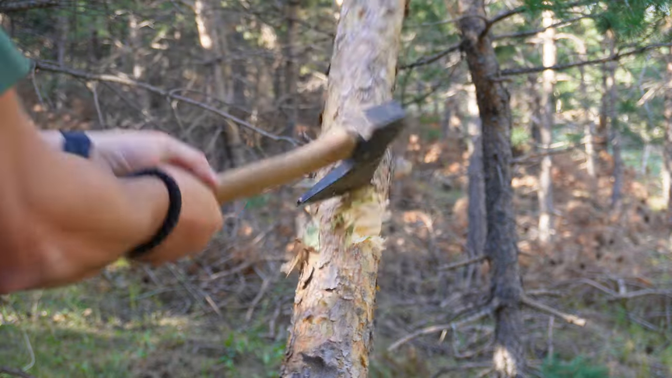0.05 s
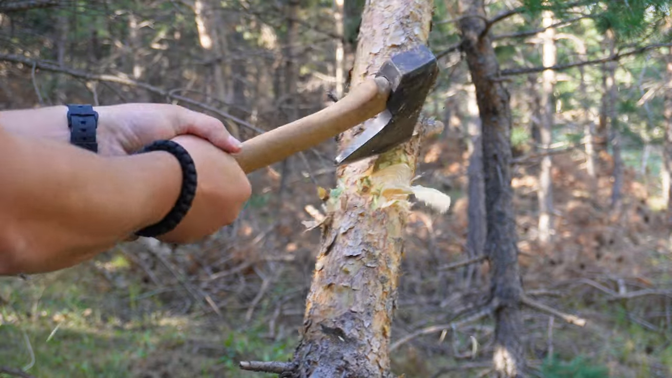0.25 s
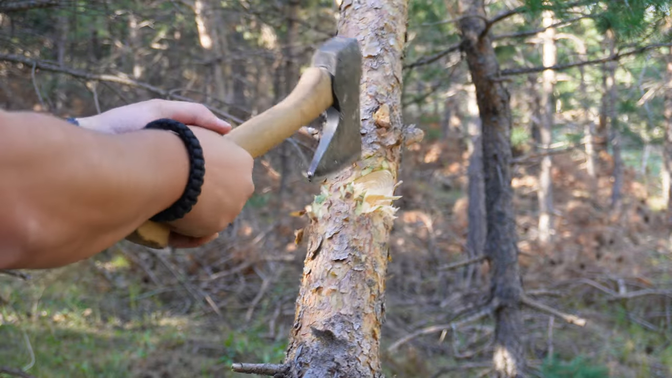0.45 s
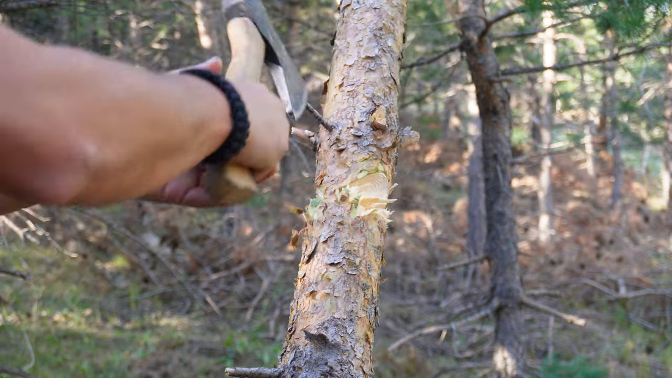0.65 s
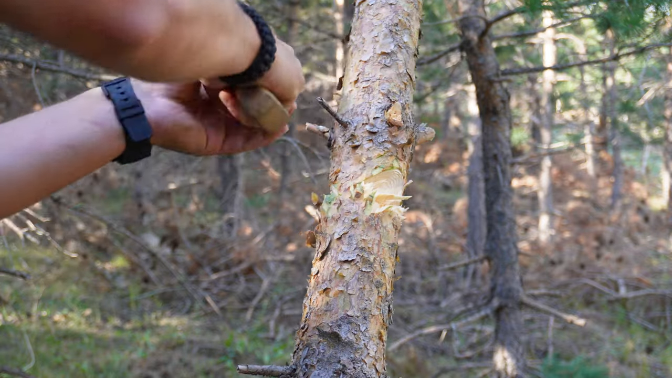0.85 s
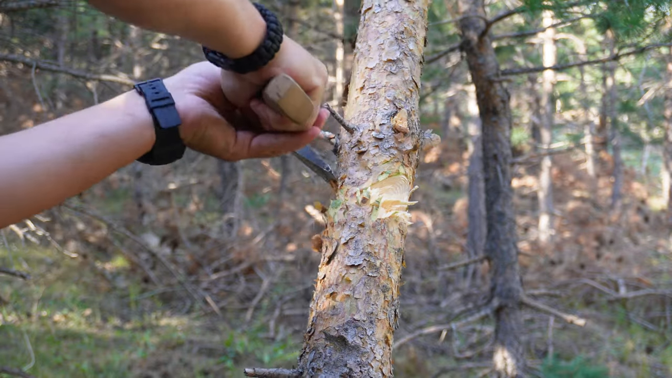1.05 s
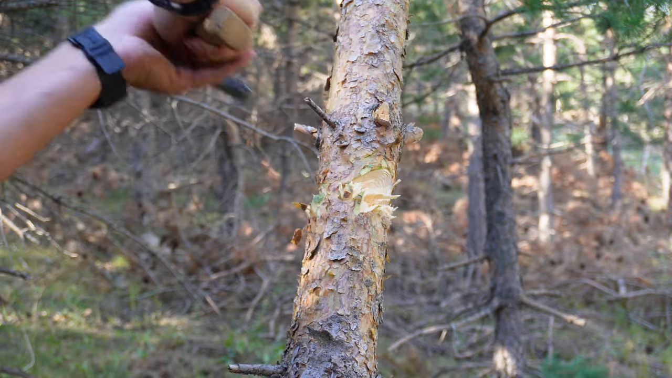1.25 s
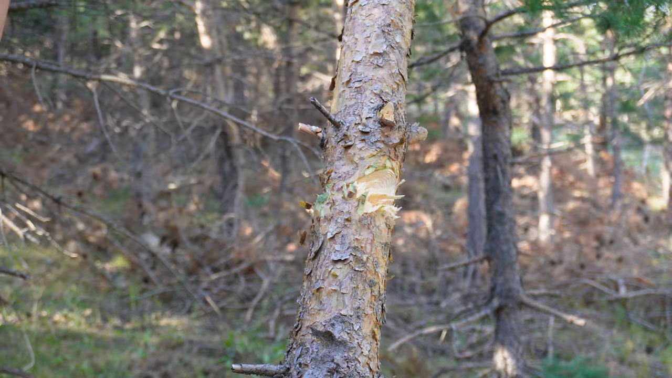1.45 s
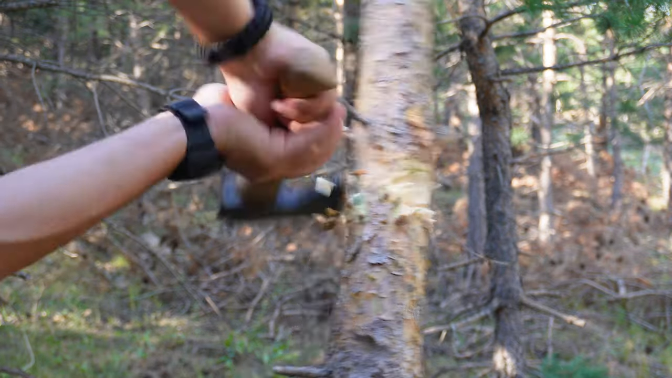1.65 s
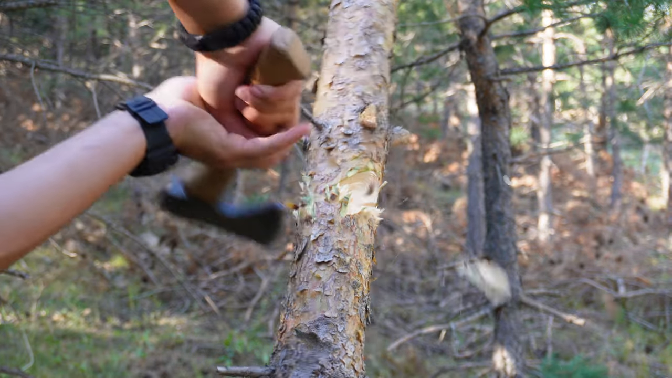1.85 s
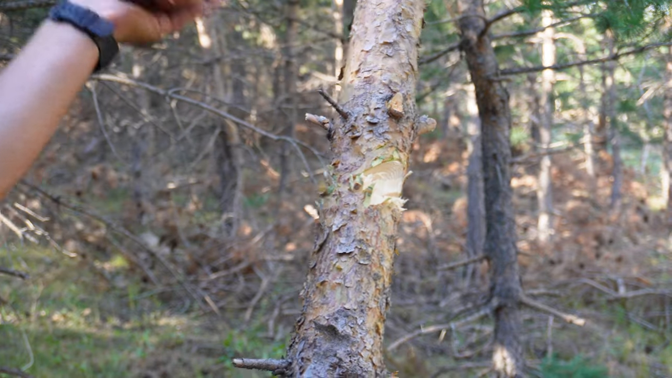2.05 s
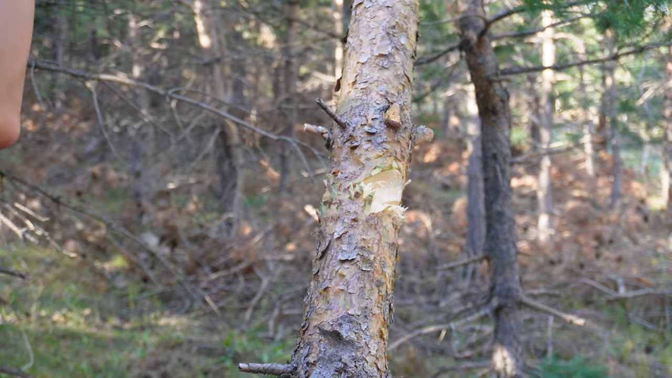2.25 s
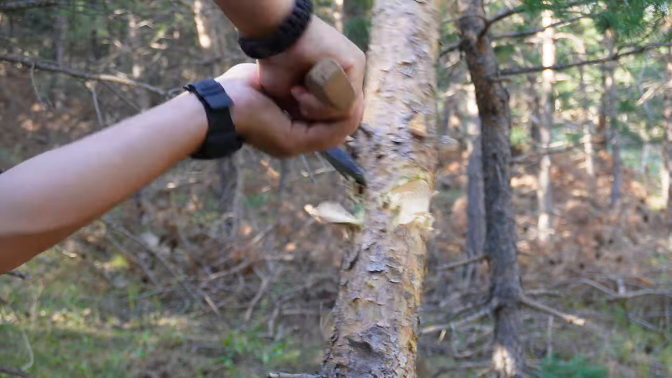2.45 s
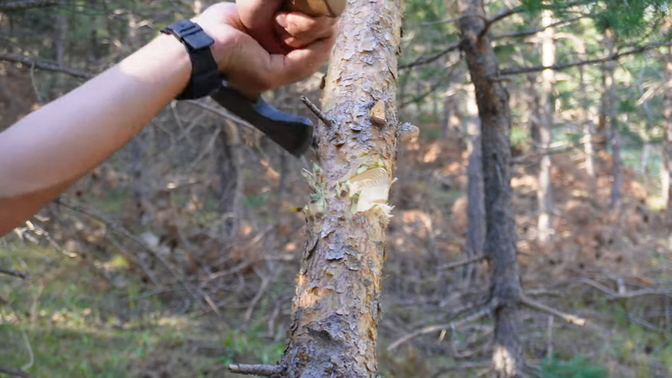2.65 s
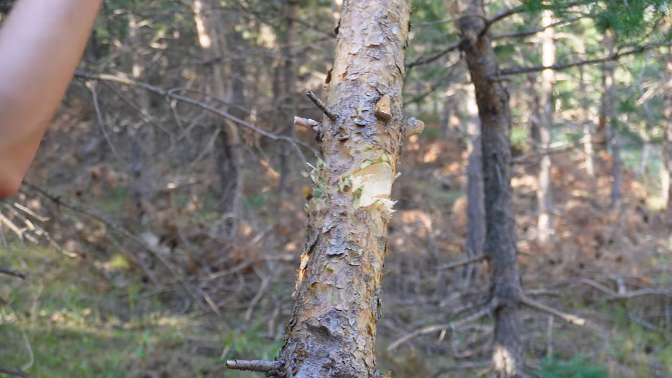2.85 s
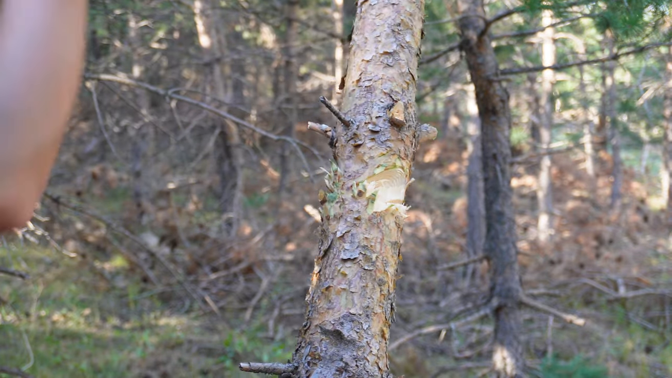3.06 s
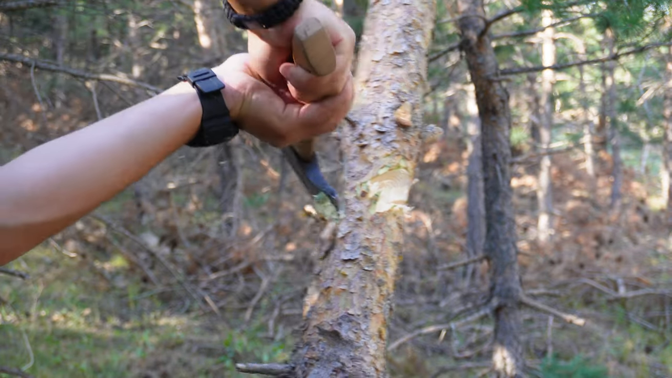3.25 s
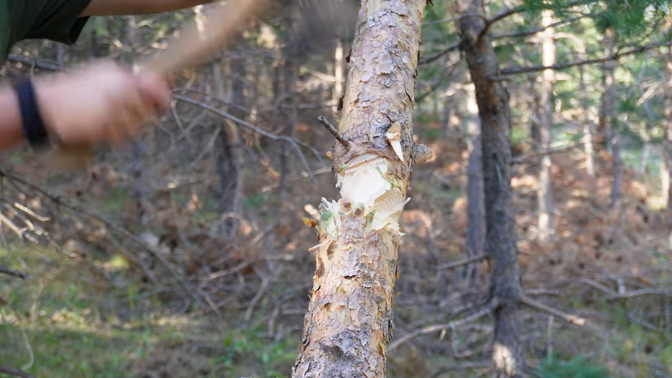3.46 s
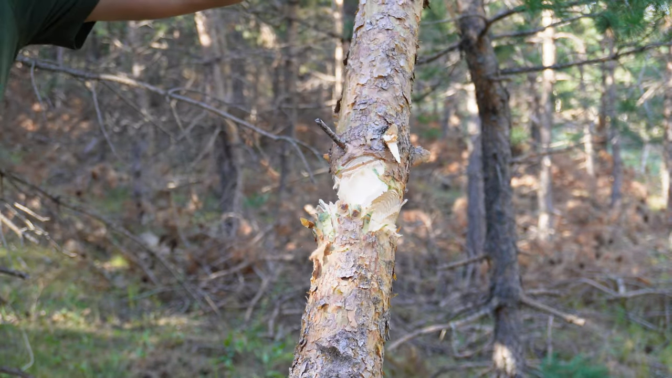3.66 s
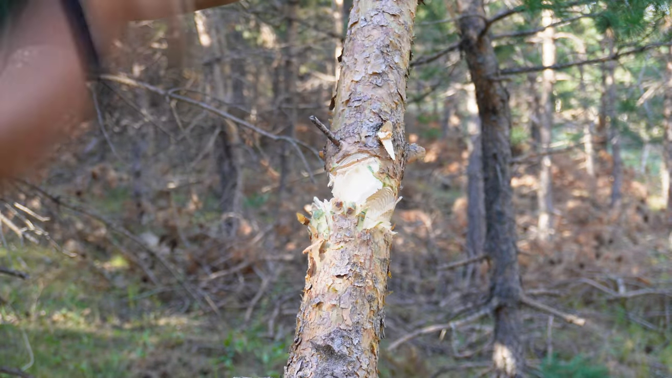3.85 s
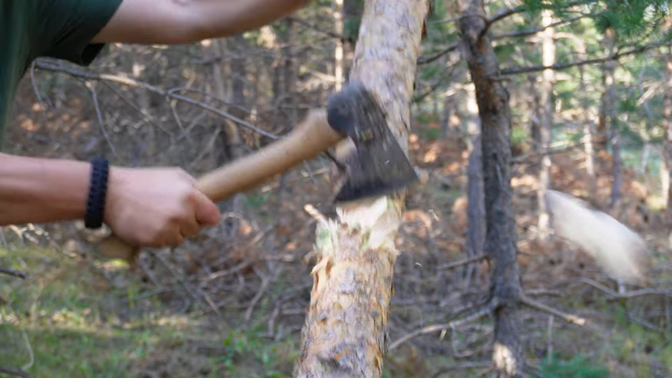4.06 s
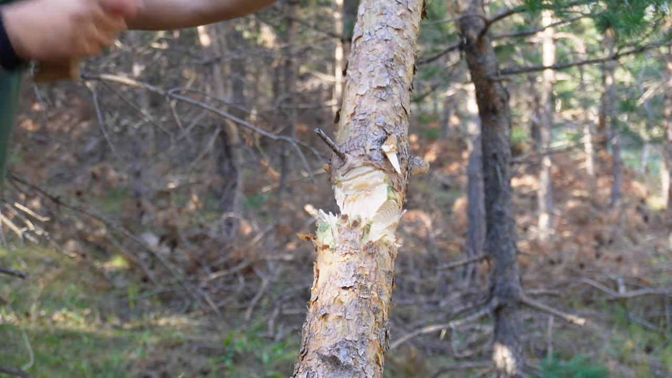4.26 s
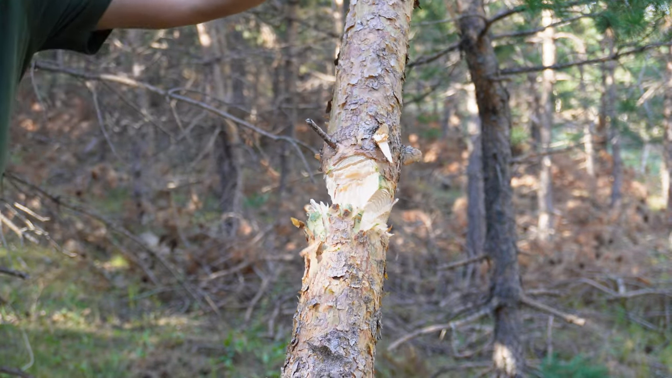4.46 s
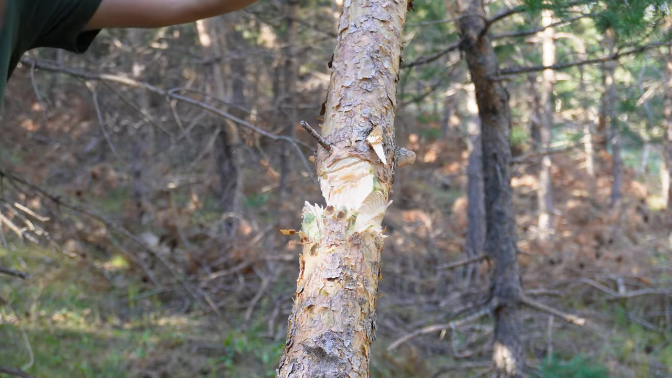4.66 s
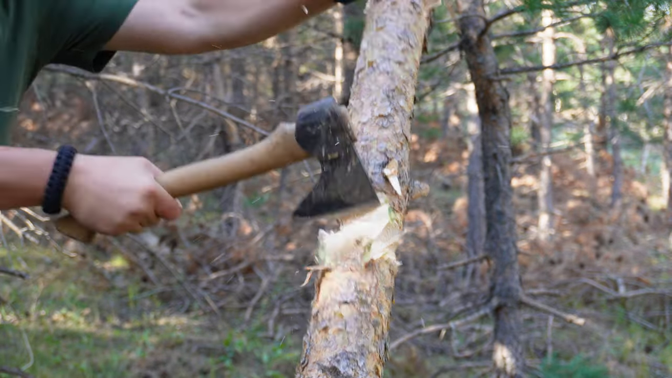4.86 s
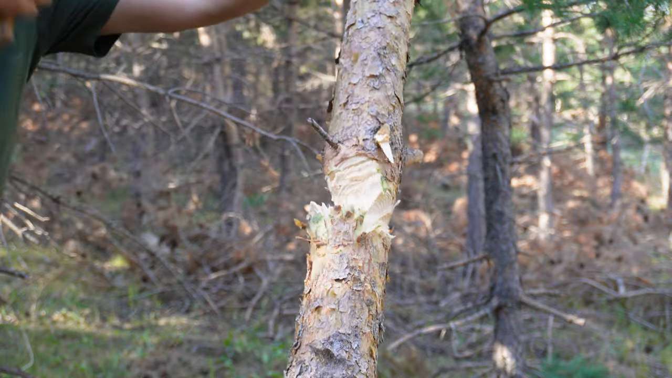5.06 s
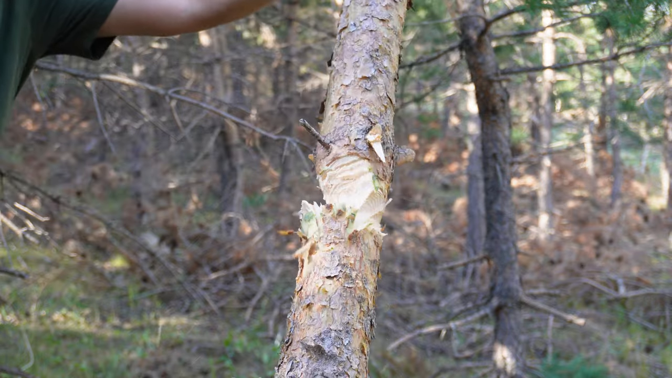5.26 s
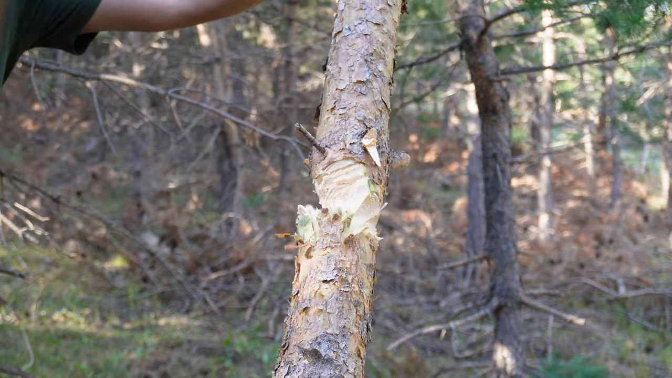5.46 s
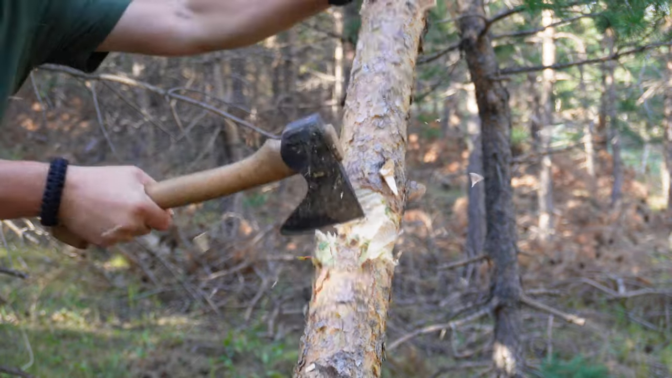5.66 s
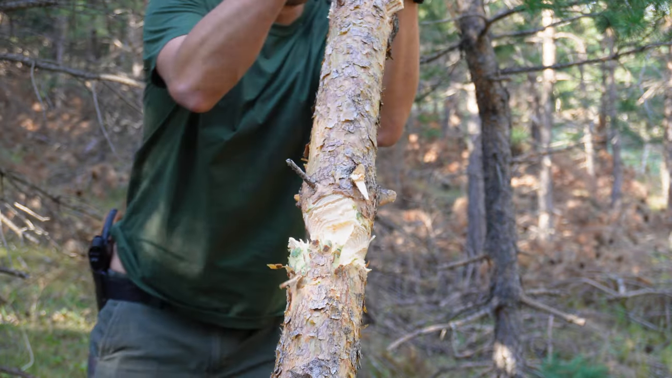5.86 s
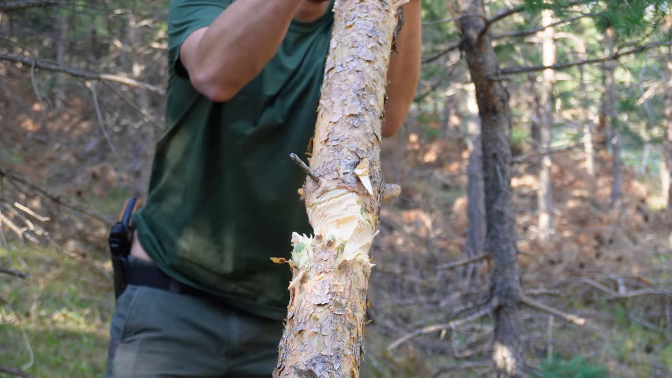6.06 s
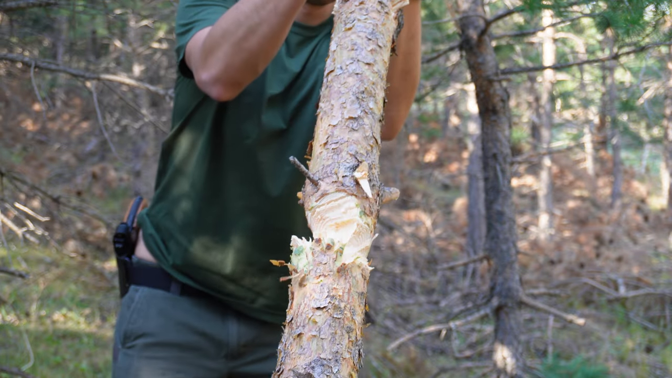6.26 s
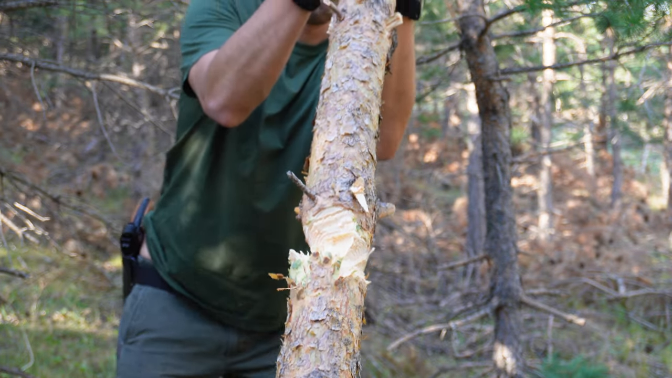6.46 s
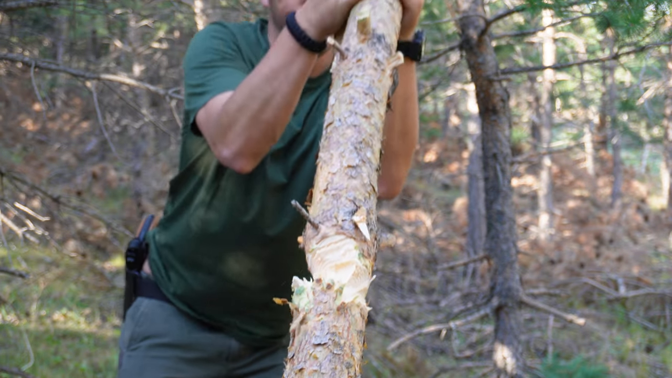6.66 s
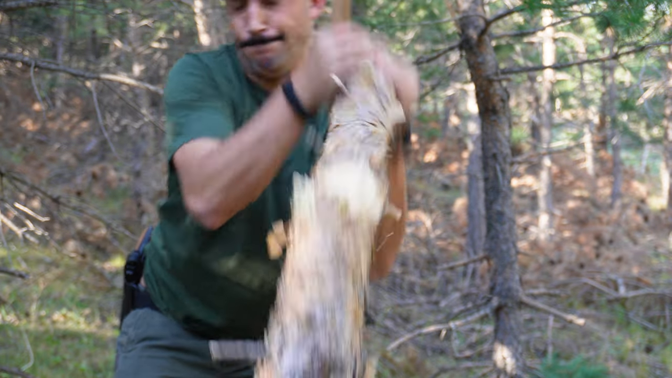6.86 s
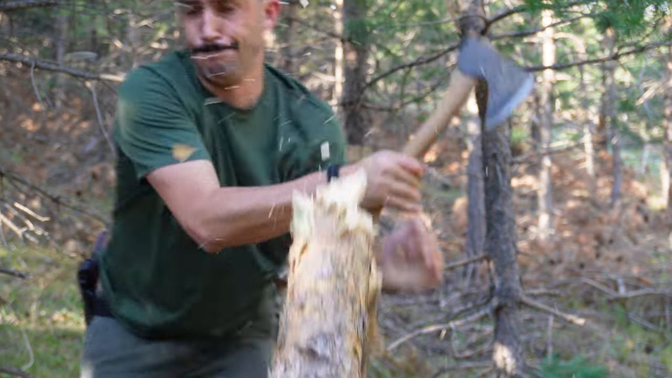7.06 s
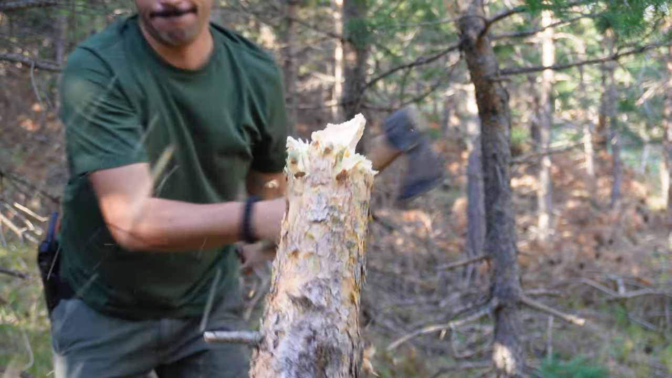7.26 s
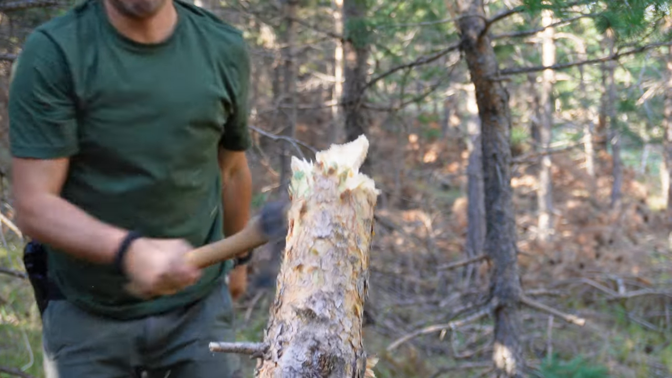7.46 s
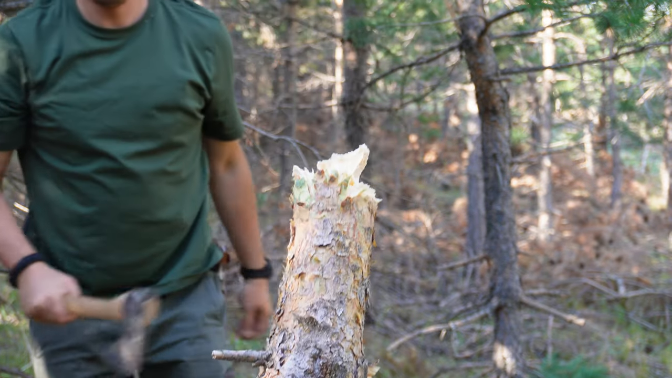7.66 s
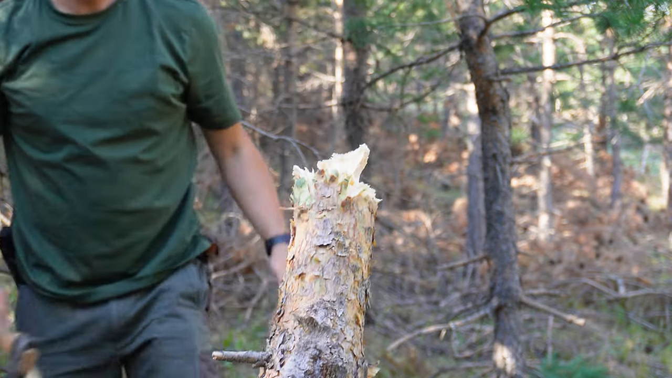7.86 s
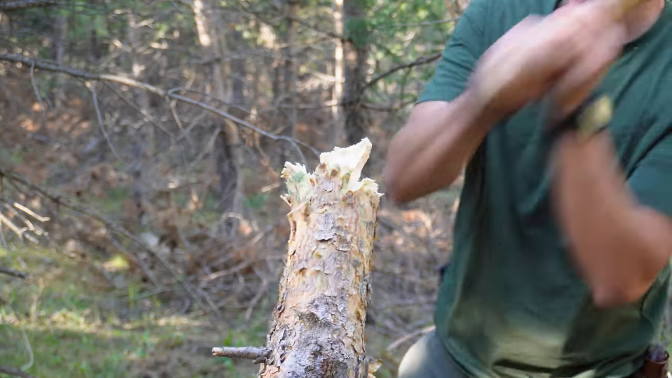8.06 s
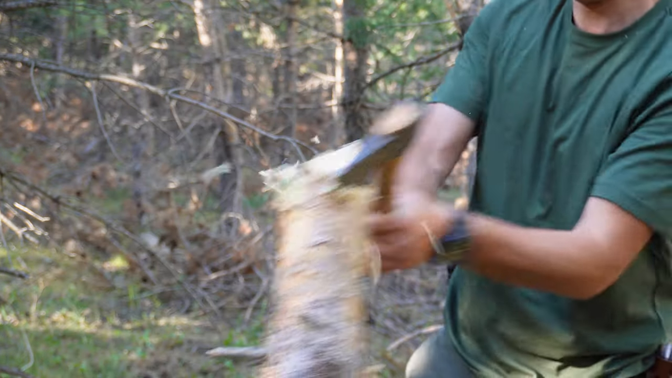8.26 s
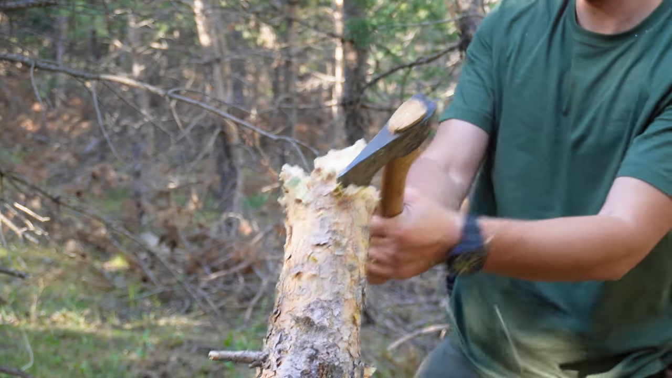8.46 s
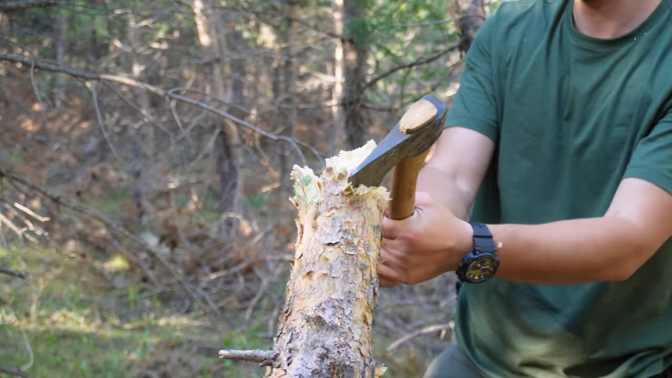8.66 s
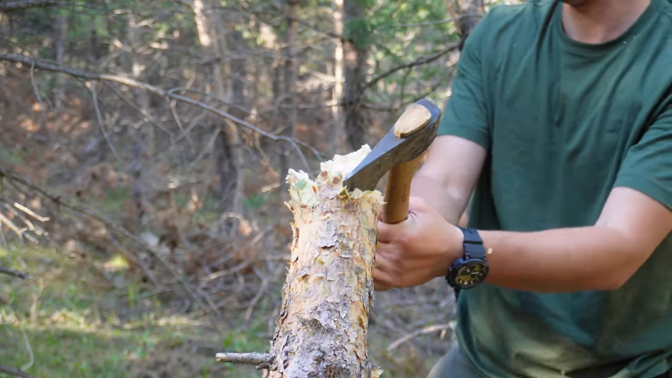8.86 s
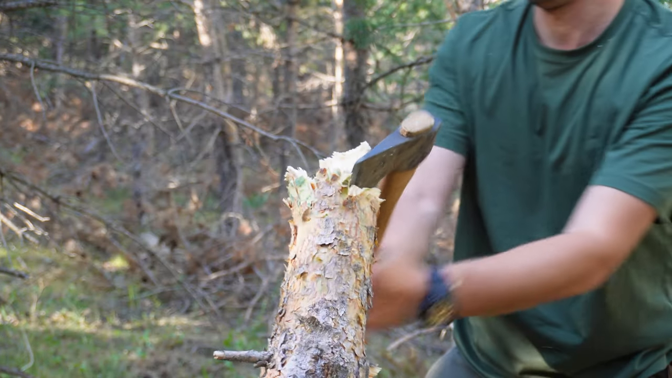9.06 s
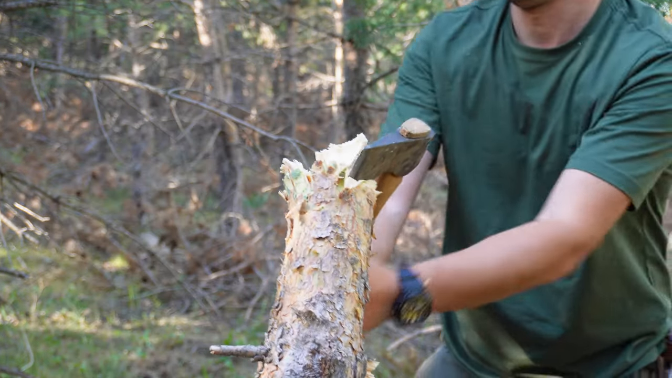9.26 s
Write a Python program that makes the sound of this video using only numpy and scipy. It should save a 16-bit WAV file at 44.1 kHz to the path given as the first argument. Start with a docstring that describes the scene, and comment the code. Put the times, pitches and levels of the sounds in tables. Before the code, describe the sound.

In a quiet woodland, heard close with slight stereo width, an axe bites a standing trunk about once a second or faster, one or two strokes much weaker. Fibres crunch and splinters tick down. Then the top tears away with rapid violent cracks, hollow knocks and falling rustle, thinning out before one last solid blow and soft settling.

```python
"""In a quiet forest a hatchet chops a thin standing pine; the top tears off and drops, then one more blow falls.
Each blow is a noise-burst crack, a bending wave falling in pitch and a slow modal ring of the trunk.
Fibres snap and crunch as short filtered bursts, loose wood knocks in damped modes, and debris rustles down
as dense clicks and hiss. The trees around scatter blows and snaps back as decaying noise bands, over a
hush of shaped noise."""
import sys
import numpy as np
from scipy import signal
from scipy.fft import rfft, irfft
from scipy.io import wavfile
from scipy.ndimage import uniform_filter1d

SR = 44100
rng = np.random.default_rng(int(sys.argv[2]) if len(sys.argv) > 2 else 0)


def generate_wav(sig):
    """Save sig (samples, or channels by samples) to the path in sys.argv[1] as 16-bit PCM at SR."""
    pcm = np.round(np.clip(np.atleast_2d(sig).T, -1, 1) * 32767).astype(np.int16)
    wavfile.write(sys.argv[1], SR, pcm)


N = 410570

# axe blows; all levels are relative settings: (t/s, crack level/dB, crack centre f/Hz, trunk ring level/dB,
# bending wave level/dB, echo level re crack/dB, sway level re trunk ring/dB)
AXE_BLOWS = [(0.089, -5, 1900, -25.5, -24.5, -2, -24), (1.031, -20.5, 3800, -47, -37.5, -16.5, -16),
             (1.731, -5.5, 2270, -23.5, -24.5, -1.5, -13.5), (2.511, -9, 3040, -30.5, -18.5, 0.5, -17),
             (3.22, -6.5, 3400, -33, -22, -0.5, -19), (3.991, -0.5, 3660, -25.5, -18, -3, -18),
             (4.544, -19, 2430, -64, -27.5, -27, -5), (4.826, -4, 2860, -26.5, -22.5, -1.5, -17),
             (5.626, -3.5, 2210, -26, -17, -3.5, -12.5), (8.238, -5.5, 2100, -32.5, -18, -3.5, -11)]
# bending modes of the trunk: (f/Hz, level/dB, t60/s)
TRUNK_MODES = [(113.6, 11, 0.1), (96.6, -10.5, 0.24), (134.5, -8.5, 0.2), (190, 4.5, 0.077)]
# slowest modes, shaking the ground: (f/Hz, level/dB, t60/s)
SWAY_MODES = [(48.5, -11.5, 0.67), (68, 1.5, 0.21)]
# modes of the wood beside the cut: (f/Hz, level/dB, t60/s)
NOTCH_MODES = [(262, 1.5, 0.042), (372, -11, 0.091), (473, 0.5, 0.041), (647, -6, 0.067), (753, -23, 0.14),
               (1189, -2.5, 0.046), (1876, -6, 0.022)]


def blows():
    """Impact excitation: a broadband crack sets off dispersive bending waves, trunk modes and scatter."""
    out, t = np.zeros((2, N)), np.arange(SR // 2) / SR
    for s, db, hz, ring_db, wave_db, echo_db, sway_db in AXE_BLOWS:
        # the crack has a flat top of about 3 ms
        crack = np.tanh(2 * burst(t[:2000], hz, 0.0028, 0.0033, -51.0))
        add(out, s, undb(db) * band(crack, 1400, 14.0))
        bending_wave(out, s, wave_db, t)
        add(out, s, undb(wave_db + 7.0) * ring(NOTCH_MODES, t, 3.5, 0.0085))
        trunk = ring(TRUNK_MODES, t, 1.5, .013)
        sway = ring(SWAY_MODES, t, 4.2, 0.003)
        late_s = s + .011  # the trunk's low ring starts about 11 ms after the crack
        add(out, late_s, undb(ring_db + 12.0) * (trunk + undb(sway_db) * sway))
        echo = trees()
        ragged = flicker(echo.shape[1], 90, 1.8)
        add(out, s, undb(db + echo_db - 26.5) * echo * ragged)
    return pan(out, LEFT_DB)


def bending_wave(out, s, wave_db, t):
    """Dispersion: treble arrives before bass, so the wave falls in pitch; the ends of the trunk return it
    twice."""
    chance = rng.standard_normal((3, 2))
    for delay_s, loss_db, (a, b) in zip((0, .002, .005), (0, -2.0, -5.0), chance):
        sweep_hz = 2600 * (1 + t / 0.00345) ** -1.4 * (1 + 0.308 * a)
        phase = 2 * np.pi * np.cumsum(sweep_hz) / SR
        wave = np.sin(phase) * fade(t, .022) * (1 - np.exp(-t / .001))
        wave = wave * flicker(len(t), 400, 5.7)
        add(out, s + delay_s * (1 + 0.17 * b), undb(wave_db + loss_db + 6.0) * wave)


# the loudest fibres and chips snapping: (t/s, peak level/dB, centre f/Hz, treble edge level re body/dB)
FIBRE_SNAPS = [(0.1014, -11, 2590, -30), (0.138, -13.5, 2830, -7), (0.546, -27, 3550, -7),
               (0.564, -27.5, 2720, -7), (1.6588, -26.5, 3460, -26), (.156, -28, 3000, -17),
               (1.795, -7, 3040, -4.5), (1.944, -18.5, 3160, -27), (1.971, -22, 3060, -1),
               (1.983, -27, 3100, -21), (2.046, -24.5, 3230, -16), (2.4759, -28, 1350, -24),
               (2.4842, -6, 1780, -29), (2.5119, -1, 5500, -7), (3.3348, -25.5, 850, -24),
               (3.4736, -23, 3140, -21), (3.483, -23, 3880, -23), (3.523, -20.5, 3080, -8),
               (3.5713, -27.5, 4300, -16), (3.5924, -23, 3500, -16), (3.8474, -18.5, 2180, -23),
               (3.9454, -20, 2140, -33), (4.355, -31.5, 2740, -18), (4.431, -28, 3970, -18),
               (4.5575, -7, 4600, -23.5), (4.6805, -18, 1890, -26), (5.122, -33, 3470, -14),
               (5.1939, -24, 3240, -13), (5.2688, -27, 2880, -32), (5.559, -28.5, 3000, -9),
               (5.6617, -13, 2560, -13), (5.745, -34, 6500, -11), (6.7791, -17.5, 3840, -28),
               (6.812, -1.5, 1740, -14.5), (6.8608, -18, 3000, -19), (6.8708, -8, 3920, -21),
               (6.8948, -5, 1170, -25), (6.9016, 2, 2800, -27), (6.9182, -3, 4500, -28),
               (6.9201, 3.5, 2950, -13), (6.9318, -4, 2860, -21), (6.942, -7, 2760, -19),
               (6.9558, -3, 2820, -27), (6.9602, -3, 4030, -20), (6.964, -2, 6300, -22),
               (6.9662, -13, 7240, -1), (6.9726, -5, 7200, -25), (6.9743, -6, 1370, -26),
               (6.9865, -6, 4160, -12), (6.992, -2, 3600, -14), (7.0108, 0, 4400, -12),
               (7.0171, 0, 4000, -10), (7.0205, -10, 3170, -12), (7.0385, -10, 4300, -10),
               (7.051, -8, 4630, -10), (7.1218, -2.5, 3330, -26), (7.203, 2, 4300, -18),
               (7.205, -11, 4580, -10), (7.2169, -3.5, 4440, -17), (7.307, -15, 2860, -23),
               (7.32, -14, 2960, -26), (7.4422, 0, 1366, -22), (7.5802, -13, 4480, -2),
               (7.617, -26.5, 960, -18.5), (7.6564, -16.5, 4530, 1), (7.699, -23.5, 1810, -23),
               (7.8185, -21, 4100, -19), (7.8406, -21, 2750, -32), (7.8565, -8, 5350, -33),
               (7.8801, -12.5, 4600, -27), (7.9038, -7.5, 4100, -32), (7.9897, -23, 2980, 2.5),
               (8.193, -14, 1820, -22), (8.282, -13, 2960, -13), (8.3222, -23.5, 2970, -28),
               (8.3617, -33, 2900, -17), (8.508, -29, 3170, -2.5), (8.6937, -30.5, 1596, 10),
               (8.743, -29, 6050, -9), (8.7957, -24.5, 4290, -2), (8.837, -33, 3520, -10),
               (8.9, -28.5, 4020, 1), (9.21, -29, 7100, 1)]
SNAP_CYCLES = 12  # t60 of a snap's main decay, in cycles of its centre


def snaps():
    """Sudden stress release: fibres give way and chips clack, each with a faint scattered answer."""
    out, call, t = np.zeros((2, N)), np.zeros((1, N)), np.arange(3000) / SR
    for s, db, hz, bright_db in FIBRE_SNAPS:
        t60 = SNAP_CYCLES / hz
        snap = burst(t, hz, 0.000072, t60, bright_db)
        add(out, s, undb(db) * pan(snap, LEFT_DB + 1.4 * rng.standard_normal()))
        call[0, int(s * SR)] = undb(db) * np.sqrt(t60 / 0.026)  # longer snaps carry more energy out
    answer = signal.fftconvolve(call, trees(), axes=1)[:, :N]
    return out + undb(-37.5) * answer


# clusters of wood crunching: (t/s, peak level/dB, centre f/Hz, length/s)
WOOD_CRUNCHES = [(1.757, -13.5, 2050, 0.022), (1.902, -12.5, 4500, 0.022), (2.516, -11, 2100, 0.046),
                 (3.033, -37, 3000, 0.011), (3.224, -9.5, 2590, 0.028), (4.555, -15.5, 2250, 0.015),
                 (6.83, -4.5, 2960, 0.0093), (6.843, -17, 2180, 0.0093), (6.892, 7, 2620, 0.0024),
                 (6.967, -5, 2900, 0.0068), (7.473, -16, 2430, .012), (7.503, -10, 4630, 0.0076),
                 (7.543, -21, 2600, 0.0084), (7.565, -32, 2920, 0.0088), (7.596, -28, 1980, 0.0098),
                 (7.633, -21.5, 2180, 0.01), (7.679, -18.5, 3330, 0.018), (7.709, -24, 5500, 0.013),
                 (7.742, -24, 2700, 0.026), (7.78, -24, 1970, 0.018), (7.915, -29, 2200, 0.011),
                 (7.952, -28, 2260, 0.0077)]
CRACKS_PER_S = 1400  # within a crunch


def crunches():
    """Progressive fracture: clustered cracks of uneven size each excite a damped resonance of the wood."""
    out, t = np.zeros((2, N)), np.arange(3000) / SR
    for s, db, hz, length_s in WOOD_CRUNCHES:
        when, size, sign = rng.random((3, len(t)))
        shape = np.sin(np.pi * np.clip(t / length_s, 0, 1) ** 0.22) + 1e-9  # quick rise, slow fall
        sizes = (when < CRACKS_PER_S / SR) * undb(20.0 * size) + 0.39  # cracks over a steady noise
        cracks = sizes * np.sign(sign - .5) * shape
        x = unit(band(cracks, hz, 0.53)) + undb(9.0) * unit(band(cracks, hz, 1.5))
        add(out, s, undb(db) * pan(x / np.max(np.abs(x)), LEFT_DB))
    return out


# wood knocking on wood and on the ground: (t/s, level/dB, freedom to ring as a factor on t60,
# ground thud level re ring/dB)
WOOD_KNOCKS = [(1.799, -14, 0.16, -4), (2.484, -24, 0.14, -18), (3.335, -17.5, 0.01, -19),
               (3.971, -17, 0.04, -9), (4.07, -15.5, 0.04, -3.5), (6.815, -21.5, 0.12, -9.5),
               (7.442, -16, 0.56, -5), (7.507, -23, 0.46, 3), (7.587, -51, 0, 19), (7.635, -43.5, 1.2, 19),
               (7.684, -41.5, 0.16, 13), (7.751, -38, 0.9, -3), (8.191, -21, 0.11, -6)]
# modes of a loose log at freedom 1: (f/Hz, level/dB, t60/s)
LOG_MODES = [(383, 0, .24), (848, -1, .09), (560, -12, .03)]
THUD_HZ, THUD_T60_S = 160, .05  # typical pitch, varied at each knock


def knocks():
    """Damping by contact: free wood rings hollow over a dull thud; held wood loses its ring at once."""
    out, t = np.zeros(N), np.arange(SR // 4) / SR
    for s, db, free, thud_db in WOOD_KNOCKS:
        modes = [(hz, mode_db, t60 * np.clip(free, .05, 1.3)) for hz, mode_db, t60 in LOG_MODES]
        hollow = ring(modes, t, 2.5, .0015, .005) * flicker(len(t), 60, 1.5)
        thud = ring([(THUD_HZ, thud_db, THUD_T60_S)], t, 0, .003, .08)
        add(out, s, undb(db) * (hollow + thud))
    return pan(out, LEFT_DB)


# soft scuffs of chips and twigs: (t/s, level/dB, centre f/Hz, swell time constant/s)
CHIP_SCUFFS = [(0.2402, -32, 2900, 0.0042), (0.341, -50.5, 2780, 0.032), (1.8983, -29, 3000, 0.0022),
               (2.169, -44.5, 2680, 0.0066), (5.214, -42.5, 3800, 0.0054), (5.7942, -35.5, 2760, 0.0047),
               (7.091, -21, 2920, 0.0039), (7.29, -32.5, 2960, 0.0064), (7.362, -29, 2900, 0.0017),
               (7.405, -35, 3080, 0.0023), (8.278, -23, 2830, 0.0023), (8.359, -30.5, 2800, 0.0016),
               (8.388, -37.5, 2790, 0.0022),]


def scuffs():
    """Friction noise: sliding chips and twigs give narrow-band noise that swells and dies."""
    out = np.zeros((2, N))
    for s, db, hz, swell_s in CHIP_SCUFFS:
        t = np.arange(int(14 * swell_s * SR)) / SR
        swell = (t / swell_s * np.exp(1 - t / swell_s / 2) / 2) ** 2
        scuff = unit(band(rng.standard_normal(len(t)), hz, 0.31)) * swell
        add(out, s, undb(db) * scuff * flicker(len(t), 123, 2.0))
    return out


# the crown drags and thumps through the undergrowth: (t/s, relative level/dB)
CROWN_DRAG = [(6.65, -70.5), (6.87, -43.5), (7.05, -76), (7.3, -67), (7.49, -47), (7.97, -48), (8.2, -56),
              (8.38, -47), (8.82, -57.5), (9.31, -53)]


def rustle():
    """Superposed impacts: dense uneven clicks in flurries over hiss; chip beds ring near 3 kHz."""
    t = np.arange(N) / SR
    middle, treble = showers()
    low = undb(np.interp(t, *np.transpose(CROWN_DRAG), left=-90))
    when, size, sign = rng.random((3, N))
    size_db = np.minimum(-4.5 * np.log(size + 1e-9), 16)
    clicks = unit((when < 700 / SR) * undb(size_db) * np.sign(sign - .5))
    # (centre f/Hz, width/octaves, level/dB, envelope)
    bands = ((73.0, 1.8, -15.5, low), (280, 1.75, -5.0, low),
             (1100, 0.57, -10.0, middle), (2040, 1.05, -2.5, middle),
             (3010, 0.26, -3.0, middle), (4200, 0.88, 1.5, middle),
             (7550, 0.53, 5.5, treble), (11700, 0.4, -6.5, treble))
    out, flurry = 0, flicker(N, 60, 2.8)
    for hz, octaves, db, envelope in bands:
        wide = min(.5 * hz / 3500, 1)  # higher bands differ more between the channels
        hiss = rng.standard_normal(N) + wide * rng.standard_normal(N) * np.array([[1], [-1]])
        grains = band(clicks + 1.1 * hiss, hz, octaves) * flurry * flicker(N, 45, 3.9)
        out = out + undb(db) * envelope * unit(grains)
    return pan(out, LEFT_DB) + ticks(middle)


# showers of splinters, bark and needles: (loudest t/s, relative level/dB, treble level re middle/dB,
# build-up/s, dying away/s)
DEBRIS_SHOWERS = [(.25, -42, -17, 0.3, 0.026), (.56, -51.5, -4.5, 0.061, 0.071),
                  (1.692, -53, -23, 0.062, 0.097), (1.907, -33, -10.5, 0.006, 0.011),
                  (1.95, -47.5, -21, 0.038, 0.19), (2.05, -44, -12, 0.024, 0.03),
                  (3.5, -53, -10, 0.34, 0.6), (4.1, -44.5, -4.5, 0.1, 0.077),
                  (4.56, -39, -3.5, 0.013, 0.04), (5.2, -49.5, -9, 0.081, 0.13),
                  (5.97, -56, -9, 0.091, 0.49), (6.281, -53.5, -10, 0.032, 0.12), (6.96, -30, -8, .07, .11),
                  (6.84, -28.5, -17, 0.032, 0.045), (7.12, -30.5, -22, 0.078, 0.055),
                  (7.228, -32.5, -14, 0.035, 0.23), (7.47, -35, -9, 0.025, 0.1),
                  (7.64, -40.5, -6.5, 0.049, 0.083), (7.76, -38.5, -20, 0.041, 0.045),
                  (7.882, -40, -14.5, 0.072, 0.066), (8.8, -58.5, -4, 0.26, 0.66),
                  (9.25, -53.5, -15, 0.15, 0.089)]
SHOWER_DROP_DB = 12  # fall in level over the build-up time and over the dying-away time
# every blow shakes debris loose; its level is relative to the crack
SHED_DB, SHED_TREBLE_DB, SHED_AFTER_S, SHED_DIES_S = -45, -17, 0.052, 0.38


def showers():
    """Power addition: middle and treble levels of showers that rise and die exponentially."""
    t = np.arange(0, N, 32) / SR
    shed = [(b[0] + SHED_AFTER_S, b[1] + SHED_DB, SHED_TREBLE_DB, SHED_AFTER_S / 2, SHED_DIES_S)
            for b in AXE_BLOWS]
    power = 0
    for s, db, treble_db, rise_s, die_s in DEBRIS_SHOWERS + shed:
        distance = np.where(t < s, (s - t) / rise_s, (t - s) / die_s)
        level_db = db - SHOWER_DROP_DB * distance
        power = power + undb(np.array([level_db, level_db + treble_db])) ** 2
    return [np.interp(np.arange(N) / SR, t, np.sqrt(p)) for p in power]


TICKS_PER_S = 30
TICK_DB, TICK_SPREAD_DB = 8, 10  # smallest tick re shower level, range of sizes above it


def ticks(middle):
    """Random point events: lone chips tick thin and bright, scaled to the shower they fall in."""
    out, t = np.zeros((2, N)), np.arange(400) / SR
    for when, size, pitch, side in rng.random((int(TICKS_PER_S * N / SR), 4)):
        s = when * N / SR
        tick = burst(t, 1800 * 2 ** (2 * pitch), .0001, 0.0027, -8 + 8.0 * pitch)
        gain = middle[int(s * SR)] * undb(TICK_DB + TICK_SPREAD_DB * size ** 2)
        add(out, s, gain * pan(tick, LEFT_DB + 4.1 * (side - .5)))
    return out


# echo bands of the trees around: (centre f/Hz, width/octaves, level/dB, t60/s)
ECHO_BANDS = [(143, 0.98, -3.5, 0.45), (306, 0.91, 5, 0.18), (626, 0.78, -3, 0.44), (1164, 0.093, -11, .8),
              (1313, 1, 2, 0.55), (2230, 0.88, 12, 0.19), (2920, 0.6, 2.5, 0.49), (4080, .8, 8.5, 0.23),
              (7100, 0.62, 2, 0.19), (11300, 0.47, -7, 0.21)]


def trees():
    """Multiple scattering: the echo builds up as more trunks answer, then dies band by band."""
    t = np.arange(int(.6 * SR)) / SR
    mid, side = rng.standard_normal((2, len(ECHO_BANDS), len(t)))
    echo = 0
    for (hz, octaves, db, t60), m, d in zip(ECHO_BANDS, mid, side):
        wide = min(0.15 + 0.27 * hz / 3500, 1)
        noise = unit(band(m + wide * d * np.array([[1], [-1]]), hz, octaves))
        echo = echo + undb(db) * fade(t, t60) * flicker(len(t), 129.8, 2.16) * noise
    return echo * (1 - np.exp(-(t / .022) ** 2))


# spectrum of the hush: (f/Hz, relative spectral level/dB)
HUSH_SPECTRUM = [(18, -64), (30, -30), (70, -10), (127, -11.5), (199, -7.5), (328, -12), (374, -12),
                 (632, -16.5), (844, -15.5), (2480, -20.5), (16000, -40.5)]
HUSH_DB = -56.5  # rms level before the slow sway


def hush():
    """Stationary shaped noise: far wind in the crowns and the microphone's hiss; bass nearly in phase."""
    hz = np.maximum(np.fft.rfftfreq(N, 1 / SR), 1)
    knot_hz, knot_db = np.transpose(HUSH_SPECTRUM)
    colour = undb(np.interp(np.log(hz), np.log(knot_hz), knot_db))
    mid, side = rfft(rng.standard_normal((2, N))) * colour
    side = side * np.clip(hz / 6000, .1, 1)
    sway_db = unit(uniform_filter1d(rng.standard_normal(N), 9000))  # slow, 1 dB rms
    return unit(irfft(np.array([mid + side, mid - side]), N)) * undb(HUSH_DB + sway_db)


def burst(t, hz, hold_s, t60, bright_db):
    """Broadband fracture: body, thud and treble edge of noise, held during contact; peak 1."""
    after = np.maximum(t - hold_s, 0)
    # the last splinters tear on faintly after the snap
    envelope = fade(after, t60) + undb(-8.0) * fade(after, 5 * t60)
    noise = np.sign(rng.standard_normal((4, len(t)))) * envelope
    noise[:, 0] *= 4  # the first break is the sharpest
    centre = unit(band(noise[0], hz, 0.84))
    body = unit(band(noise[1], 2980, 1.3))
    thud = unit(band(noise[3], 900, 2.04))
    edge = unit(band(noise[1] + .42 * noise[2] * np.array([[1], [-1]]), 8000, 1.2))
    x = centre + undb(-3.0) * body + undb(-16.5) * thud + undb(bright_db) * edge
    return x / np.max(np.abs(x))


def ring(modes, t, scatter_db, swell_s, detune=.03):
    """Modal superposition: bending waves are slower in the bass, so low modes swell later."""
    out = 0
    for (hz, db, t60), (a, b) in zip(modes, rng.standard_normal((len(modes), 2))):
        swell = (1 - np.exp(-t / (swell_s * np.sqrt(100 / hz)))) ** 3
        tone = np.sin(2 * np.pi * hz * (1 + detune * b) * t)
        out = out + undb(db + scatter_db * a) * swell * fade(t, t60) * tone
    return out


def flicker(count, rate, spread_db):
    """Amplitude modulation: gain glides between random levels in dB, about rate of them a second."""
    knots = rng.standard_normal(int(count / SR * rate) + 2)
    return undb(spread_db * np.interp(np.arange(count) * rate / SR, np.arange(len(knots)), knots))


LEFT_DB = 1.7  # lean of the treble to the left


def pan(x, db):
    """Interchannel level difference: only the treble leans to one side, by db in all."""
    treble = signal.sosfilt(signal.butter(2, 220, "high", fs=SR, output="sos"), x)
    return x + (undb(np.array([[db / 2], [-db / 2]])) - 1) * treble


def undb(db):
    """Logarithmic level: amplitude gain of a level in dB."""
    return 10 ** (np.asarray(db) / 20)


def fade(t, t60):
    """Exponential decay: 60 dB in t60 seconds."""
    return np.exp(-np.log(1000) * t / t60)


def band(x, hz, octaves):
    """Band-pass filtering along the last axis, around hz on a logarithmic scale."""
    edges = np.clip(hz * 2. ** np.array([-octaves / 2, octaves / 2]), 20, .45 * SR)
    return signal.sosfilt(signal.butter(2, edges, "band", fs=SR, output="sos"), x)


def unit(x):
    """Normalisation: scale to rms 1."""
    return x / np.sqrt(np.mean(x ** 2))


def add(out, s, x):
    """Linear superposition: mix x into out from time s."""
    i = int(s * SR)
    x = x[..., :N - i]
    out[..., i:i + x.shape[-1]] += x


def scene():
    """Superposition of axe, wood, debris and forest at the microphone."""
    wood = blows() + snaps() + crunches() + knocks()
    return wood + scuffs() + rustle() + hush()


TOP_HZ = 16600


def record(dry):
    """Saturation and low-pass filtering: the loudest peaks are rounded and the top is cut."""
    rounded = .82 * np.tanh(dry / .82)
    return signal.sosfilt(signal.ellip(12, .2, 100, TOP_HZ, fs=SR, output="sos"), rounded)


dry = scene()
out = record(dry)
generate_wav(out)
```